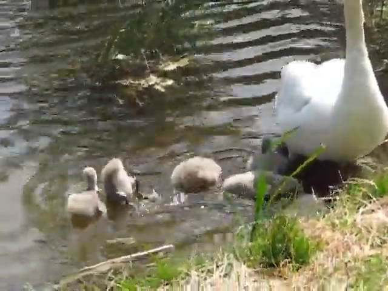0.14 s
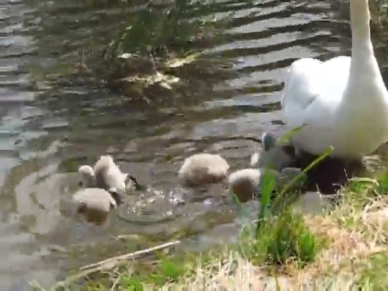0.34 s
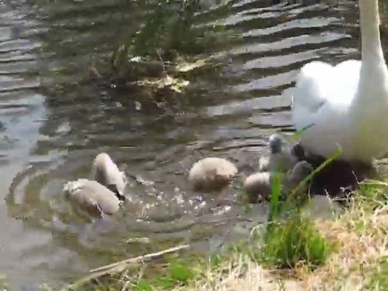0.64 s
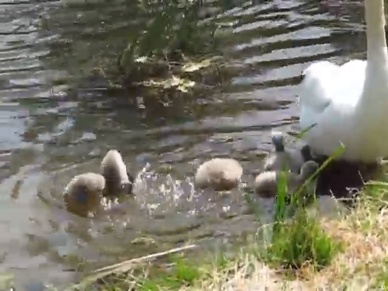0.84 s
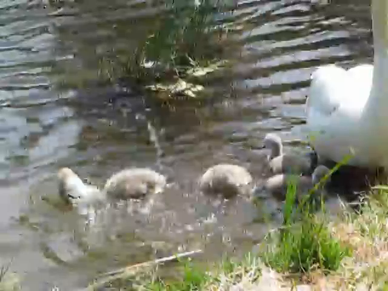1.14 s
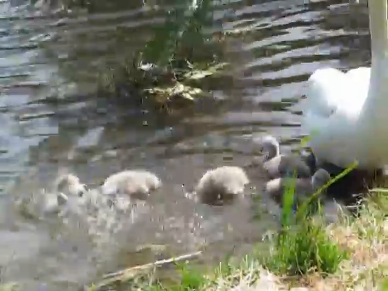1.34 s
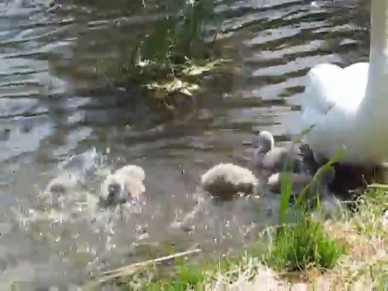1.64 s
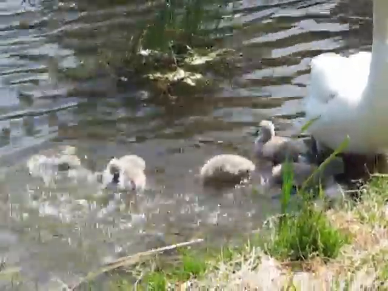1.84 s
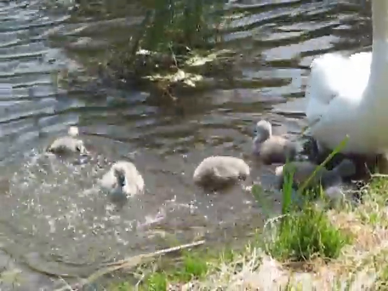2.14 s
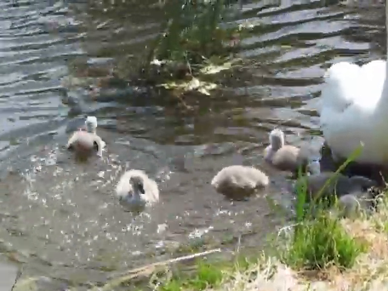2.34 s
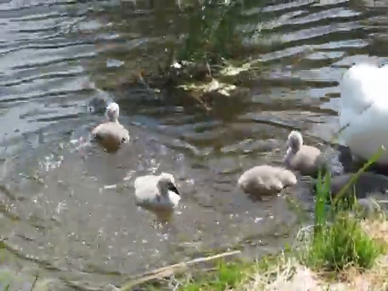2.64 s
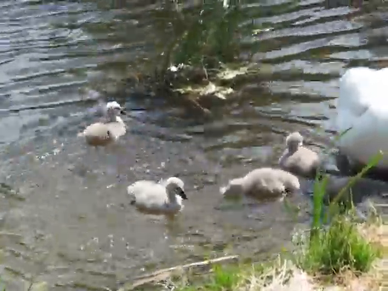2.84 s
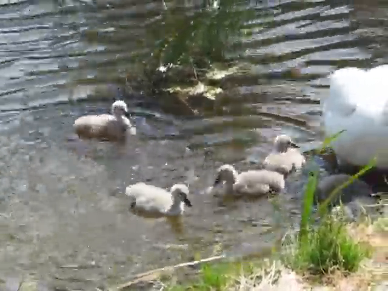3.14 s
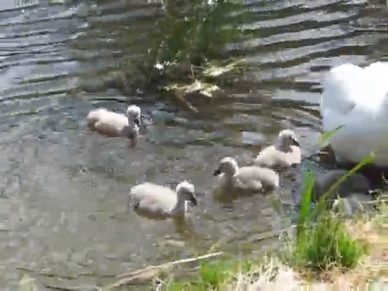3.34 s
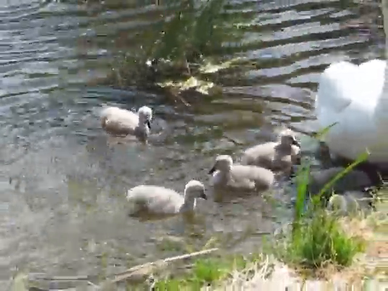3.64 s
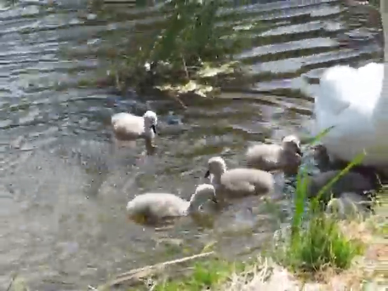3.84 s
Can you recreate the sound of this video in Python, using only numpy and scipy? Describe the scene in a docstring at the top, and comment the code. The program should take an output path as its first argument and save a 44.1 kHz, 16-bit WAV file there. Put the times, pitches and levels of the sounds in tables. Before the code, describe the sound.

Young swans splash in shallow water by a bank, with early honks and gusty wind on the microphone

```python
"""Cygnets and swan by a windy bank

Close by, cygnets splash in shallow water beside a bank: rising bubble tones, noise puffs, ticks and fine drops.
A swan off to one side honks twice, pulses and breath noise in a resonant throat; a chick peeps faint whistles.
Gusty wind buffets the two microphone ports separately, as shaped noise with sharp thumps.
Far off lies a wash of shaped noise with a hum near 850 Hz, and a thin throbbing whine."""
import sys
import numpy as np
from scipy import signal
from scipy.fft import rfft, irfft
from scipy.io import wavfile
from scipy.ndimage import uniform_filter1d

SR = 44100
rng = np.random.default_rng(int(sys.argv[2]) if len(sys.argv) > 2 else 0)


def materialize(psi):
    """Save the field psi as 16-bit PCM at rate SR to the path in sys.argv[1].

    A 1-D psi becomes a single channel; in a 2-D psi each row is a channel.
    """
    bounded = np.clip(np.atleast_2d(psi).T, -1, 1)
    quanta = np.round(bounded * 32767).astype(np.int16)
    wavfile.write(sys.argv[1], SR, quanta)


N = 176400  # 4 s


def amp(db):
    """Gain from dB."""
    return 10 ** (np.asarray(db) / 20)


def evened(x):
    """Scales to rms 1."""
    return x / np.sqrt(np.mean(x ** 2) + 1e-20)


def read(points, hz):
    """Spectrum table at given frequencies, interpolated along log frequency."""
    f, value = np.transpose(points)
    return np.interp(np.log(hz + 1), np.log(f + 1), value)


def curve(rows, t):
    """Columns of a curve table at given times."""
    s, *cols = np.transpose(rows)
    return [np.interp(t, s, c) for c in cols]


def add(mix, s, sound):
    """Mixes a sound in at a time in seconds."""
    part = mix[round(s * SR):][:len(sound)]
    part += sound[:len(part)]


def coloured(points):
    """Two unrelated channels of noise with a given spectrum, joint rms 1."""
    gain = amp(read(points, np.fft.rfftfreq(N, 1 / SR)))
    return evened(irfft(rfft(rng.standard_normal((2, N))) * gain, N))


def resonate(x, hz, width):
    """A resonance of gain 1, fixed or moving: shift to 0 Hz, smooth, shift back."""
    turn = np.exp(2j * np.pi * np.cumsum(hz * np.ones(len(x))) / SR)
    r = np.exp(-np.pi * width / SR)
    return 2 * (turn * signal.lfilter([1 - r], [1, -r], x / turn)).real


# Likeness of the two microphone ports: (frequency [Hz], shared share [0-1])
PORT_LIKENESS = [(60, 0.13), (180, 0.7), (550, 1), (1650, 0.5), (4970, 0.2), (15000, 1)]
# Port balance: (frequency [Hz], left minus right [dB])
PORT_BALANCE = [(60, -6), (180, 0), (550, 1), (1650, -4.5), (4970, -2), (15000, 2)]
# Port phase: (frequency [Hz], lead of the left port [rad])
PORT_LEAD = [(0, 0.13), (1290, 0.47), (2840, 0.48), (4130, 0.75), (4820, 0.28), (15200, 1)]


def ports(x, other, balance=PORT_BALANCE, lead=PORT_LEAD):
    """Sound reaching both microphone ports: balance and phase lead, the right also taking in another sound."""
    hz = np.fft.rfftfreq(N, 1 / SR)
    same = np.clip(read(PORT_LIKENESS, hz), 0, 1)
    half = amp(read(balance, hz) / 2)
    left = rfft(x)
    right = same * left * np.exp(-1j * read(lead, hz)) + np.sqrt(1 - same ** 2) * rfft(other)
    return irfft([left * half, right / half], N)


# Far background, before the trims below: (time [s], hum level [dB], treble level [dB])
WASH_LEVEL = [(0.0, -44, -49), (0.63, -43.5, -50.5), (1.53, -40.5, -48.5), (2.38, -51, -55),
              (4.0, -55, -58.5)]
# Spectrum of the far hum: (frequency [Hz], relative level [dB per Hz])
HUM_SPECTRUM = [(150, -21), (350, -1.5), (550, -6), (850, 2.5), (1100, -4), (1400, -10.5), (2200, -20.5),
                (3500, -29)]
# Spectrum of the far hiss: (frequency [Hz], relative level [dB per Hz])
HISS_SPECTRUM = [(880, -16), (1500, -1.5), (2830, -2), (4440, -6.5), (5510, -6.5), (8150, -13),
                 (15600, -29.5)]
HUM_DB, HISS_DB, WHINE_DB = 3.5, 3, -17.5  # trims on the levels; the whine follows the treble
WHINE_HZ, WHINE_THROB_HZ = 7882, 30


def wash():
    """Distant hum and smooth hiss as shaped noise, with a thin throbbing whine equal on both ports."""
    t = np.arange(N) / SR
    hum_db, hiss_db = curve(WASH_LEVEL, t)
    hum = amp(hum_db + HUM_DB) * coloured([(60, -24)] + HUM_SPECTRUM + [(7000, -50)])
    hiss = amp(hiss_db + HISS_DB) * coloured([(500, -22)] + HISS_SPECTRUM)
    throb = 1 + 0.79 * np.sin(2 * np.pi * WHINE_THROB_HZ * t)
    whine = amp(hiss_db + WHINE_DB) * np.sin(2 * np.pi * WHINE_HZ * t) * throb
    return ports(*(hum + hiss)) + whine


# Wind on the microphone, level of the rumble and body: (time [s], left port [dB], right port [dB])
GUSTS = [(0.0, -33, -19), (0.06, -18, -10), (0.1, -34, -18), (0.19, -21, -19), (0.23, -23, -28.5),
         (0.44, -35, -15.5), (0.48, -33, -11), (0.53, -34, -25.5), (0.62, -25, -13.5), (0.66, -36, -21.5),
         (0.74, -27, -17.5), (0.81, -35, -26), (0.84, -16.5, -28), (0.93, -31.5, -25.5), (1.06, -29, -29),
         (1.6, -34.5, -30), (1.7, -16.5, -19), (1.73, -45, -16), (1.78, -10, -27.5), (1.83, -15, -10),
         (1.9, -10.5, -18), (1.94, -35, -16.5), (2.03, -16.5, -21.5), (2.09, -13.5, -8.5), (2.32, -34, -17),
         (2.36, -14, -12.5), (2.43, -28.5, -17), (2.46, -11, -19.5), (2.51, -31, -16.5),
         (2.7, -23.5, -11.5), (2.75, -7.5, -8), (2.84, -18, -17.5), (3.11, -20, -10), (3.18, -25, -13.5),
         (3.22, -14.5, -14), (3.25, -29, -17), (3.29, -16.5, -15), (3.5, -32.5, -17), (3.54, -12.5, -9),
         (3.58, -19.5, -10.5), (3.62, -24, -14.5), (3.66, -19, -12), (3.79, -28, -13.5), (4.0, -10.5, -16)]
# Wind rumble: (frequency [Hz], relative level [dB per Hz])
RUMBLE = [(12, -3.5), (30, 0.5), (60, 1), (90, -0.5), (140, -17.5), (300, -33), (900, -97)]
# Body of the stronger gusts: (frequency [Hz], relative level [dB per Hz])
BODY = [(40, -69), (80, -3.5), (130, 0), (180, -4.5), (250, -20.5), (450, -60), (900, -94)]
# Brighter buffeting: (frequency [Hz], relative level [dB per Hz])
BUFFET = [(100, -48), (220, 4.5), (300, -2.5), (420, -8.5), (650, -21.5), (1500, -55)]
# Sharp thumps in the gusts, the push about 3 ms after the time:
# (time [s], peak above 180 Hz before port split and limit [dB], left minus right before ONE_SIDED [dB])
THUMPS = [(0.62, -17.5, -20.0), (1.808, -5, 7.5), (1.896, -8.5, -9.5), (2.109, -9, 1), (2.353, -11, -13),
          (2.401, -3, -13), (2.449, -2.5, -7.5), (2.462, -10, -13), (2.749, -14, 16), (2.792, -8, -5),
          (3.066, -33, -14), (3.11, -7, -8), (3.135, -21, -8), (3.531, -9.5, -9), (3.789, -4, -22),
          (3.921, -14, -15)]
STRONG_DB = -14.5  # port level of a strong gust
BODY_DB, BODY_GROWTH = -0.5, 0.28  # share at a strong gust [dB], growth per dB
BUFFET_DB, BUFFET_GROWTH = -17, 0.73  # likewise
LUMP_DB, LUMP_S = 4.5, 0.017  # depth of the lumps, smoothing time
RUMBLE_LUMP, BUFFET_LUMP = 0.47, 1.04  # factors on the lump depth
THUMP_S, THUMP_BACK = .0011, 0.31  # half-length of the inward push [s], size of the slower swing back
THUMP_BASS_DB = 6.5  # full peak over its part above 180 Hz
ONE_SIDED = 1.95  # how strongly a thump keeps to one port
WIND_LIMIT = .96  # ceiling of the soft limit


def wind():
    """Lumpy rumble per port; stronger gusts carry more body and brighter buffeting; thumps push inward."""
    port_db = np.array(curve(GUSTS, np.arange(N) / SR))
    size = int(LUMP_S * SR)
    slow = uniform_filter1d(uniform_filter1d(rng.standard_normal((2, N)), size), size)
    lump_db = LUMP_DB * np.clip(evened(slow), -2.5, 2.2)
    rumble = evened(coloured(RUMBLE) * amp(RUMBLE_LUMP * lump_db))
    body = evened(coloured(BODY) * amp(lump_db))
    buffet = evened(coloured(BUFFET) * amp(BUFFET_LUMP * lump_db))
    over_db = port_db - STRONG_DB
    body_share = amp(BODY_DB + BODY_GROWTH * over_db)
    push = (rumble + body_share * body) / np.sqrt(1 + body_share ** 2)
    push = push + amp(BUFFET_DB + BUFFET_GROWTH * over_db) * buffet
    push = amp(port_db) * push
    t = np.arange(-500, 900) / SR
    swing_back = THUMP_BACK * np.exp(-((t - 1.94 * THUMP_S) / (2.9 * THUMP_S)) ** 2)
    thump = swing_back - np.exp(-(t / THUMP_S) ** 2)
    for s, db, pan in THUMPS:
        for side, sign in zip(push, (-1, 1)):
            port_gain = 1 / np.sqrt(1 + amp(2 * ONE_SIDED * sign * pan))
            add(side, s - .008, amp(db + THUMP_BASS_DB) * port_gain * thump)
    return push / (1 + (push / WIND_LIMIT) ** 4) ** (1 / 4)


# Chick's peeps: (start [s], length [s], start pitch [Hz], top pitch [Hz], end pitch [Hz], level [dB])
PEEPS = [(1.955, .07, 1900, 2300, 2250, -57), (2.832, .092, 1860, 2500, 2000, -55.5),
         (3.262, .061, 1830, 2220, 1960, -56)]
PEAK_AT = 1.4  # above 1 sets the top of the pitch arch past the middle


def peep(start, length, from_hz, top_hz, end_hz, db):
    """A thin sine whistle that arches up in pitch and falls."""
    u = np.arange(0, 1, 1 / (length * SR))
    bent = u ** PEAK_AT
    arch = 1 - abs(1 - 2 * bent) ** 1.6
    hz = top_hz - (1 - arch) * np.where(bent < .5, top_hz - from_hz, top_hz - end_hz)
    fade = np.minimum(np.minimum(u, 1 - u) / 0.075, 1)
    return start, amp(db) * np.sqrt(2) * fade * np.sin(2 * np.pi * np.cumsum(hz) / SR)


# The swan's two honks, ahead of the port balance: (time [s], pitch [Hz], level [dB], roughness [0-1, clipped])
HONKS = [
    [(.192, 524, -58, 0), (.202, 492, -32, 0.3), (.227, 474, -28, 0.31), (.243, 457.5, -33.5, 0.4),
     (.256, 379, -32, 0.9), (.272, 340, -42, 1.1), (.285, 320, -49, 0.8)],
    [(.352, 587.7, -40.5, 0.6), (.36, 582, -29.5, 0.68), (.378, 562.7, -37, 0.4), (.39, 542, -25, 0.6),
     (.413, 541.7, -29.5, 0.6), (.436, 575, -29.5, 0.47), (.456, 553, -37, 0.3), (.475, 552, -47, 0.4)],
]
# Throat resonances, before mouth and width factors: (frequency [Hz], width [Hz], level [dB])
THROAT = [(570, 90, -3), (1050, 230, 0), (2020, 280, 0), (2500, 300, -10), (3950, 450, -23)]
FLUTTER_HZ, FLUTTER = 83.2, 0.59  # mean rate; depth at full roughness
JITTER = .5  # random pitch wander at full roughness
OPEN_HZ, MOUTH = 520, .35  # pitch at which the throat sits as tabled; how far it follows the pitch


def honk(rows):
    """Pulses and gated breath noise drive the throat; roughness adds breath, jitter and flutter."""
    t = np.arange(rows[0][0], rows[-1][0], 1 / SR)
    hz, level_db, rough = curve(rows, t)
    rough = np.clip(rough, 0, 1)
    wander = uniform_filter1d(rng.standard_normal(len(t)), 60)
    turns = np.cumsum(hz * (1 + JITTER * rough * wander)) / SR
    folds = sum(np.cos(2 * np.pi * k * turns) for k in range(1, 11))
    flutter_hz = FLUTTER_HZ * (1 + 4.7 * uniform_filter1d(rng.standard_normal(len(t)), 500))
    folds = folds * np.exp(FLUTTER * rough * np.sin(2 * np.pi * np.cumsum(flutter_hz) / SR))
    # breath bursts at the start of each cycle, then dies away
    puffs = (0.19 + np.exp(-(turns % 1) / 0.21)) * rng.standard_normal(len(t))
    drive = (1 - rough) * evened(folds) + rough * evened(puffs)
    mouth = (hz / OPEN_HZ) ** MOUTH
    throat = np.zeros(len(t))
    for k, (f, width, db) in enumerate(THROAT):
        ring = resonate(resonate(drive, f * mouth, 1.32 * width), f * mouth, 1.76 * width)
        throat += (-1) ** k * amp(db) * ring
    return t[0], amp(level_db) * evened(throat)


GLIDE = 12  # relative pitch rise per s


def swell(t, length):
    """Envelope that reaches 1 at the given length and dies away."""
    return t / length * np.exp(1 - t / length)


def bubble(hz, length):
    """A small bubble: a brief tone with rising pitch, swelling and dying."""
    t = np.arange(1500) / SR
    return np.sin(2 * np.pi * hz * (t + GLIDE * t ** 2 / 2)) * swell(t, length)


def burst(hz, width, length):
    """A short puff of noise around a centre, peak 1."""
    t = np.arange(1500) / SR
    puff = rng.standard_normal(len(t)) * swell(t, length) ** 2
    for _ in range(3):
        puff = resonate(puff, hz, width)
    return puff / abs(puff).max()


TICK_CYCLES = .6  # half-length of a tick


def tick(hz):
    """A sharp wide click: about one cycle."""
    turns = np.arange(-40, 40) / SR * hz
    return np.sin(2 * np.pi * turns) * np.exp(-(turns / TICK_CYCLES) ** 2)


def patter():
    """Randomly timed fine drops, as small bubbles in 24 pitches, rms 1."""
    drops_per_s, spread_db, cycles, tilt_db = 1500, 4., 4., -3  # tilt per octave
    size = amp(spread_db * np.minimum(rng.exponential(1, N), 4)) * (rng.random(N) < drops_per_s / SR)
    kind = rng.integers(0, 24, N)
    drops = np.zeros(N)
    for k, hz in enumerate(np.geomspace(1700, 10500, 24)):
        drop = bubble(hz, cycles / (6 * hz)) * amp(tilt_db * np.log2(hz / 1000))
        drops += signal.oaconvolve(size * (kind == k), drop)[:N]
    return evened(drops)


# Close plops, level before the near gain: (time [s], level [dB], pitch [Hz], swelling time [ms])
PLOPS = [(0.3428, -32, 1830, 2.7), (0.6848, -34.5, 2530, 1.7), (0.7196, -38, 2390, 1.56),
         (0.859, -31, 3340, 2.3), (0.9191, -30.5, 4080, 2), (1.049, -31.5, 2686, 2.15),
         (1.118, -21.5, 2360, 2), (1.12, -18, 2020, 1.47), (1.1255, -33, 1900, 1), (1.204, -38, 3720, 2.2),
         (1.241, -36, 4900, 0.76), (1.251, -34, 2610, 2.37), (1.2916, -32, 1830, 2.6),
         (1.313, -29.5, 2280, 1.7), (1.3347, -36, 2640, 2.2), (1.3788, -35.5, 4900, 1.7),
         (1.4217, -38, 1690, 3.8), (1.5227, -33, 2280, 1.75), (1.5442, -33, 3040, 2.3),
         (1.6735, -29, 2720, 2.2), (1.6834, -30, 2450, 1.9), (1.839, -33, 2130, 1.9),
         (1.8617, -32, 1830, 2.8), (1.8844, -34.5, 3225, 2.2), (2.064, -38, 2050, 0.86),
         (2.1137, -36, 2600, 1.33)]
# Bright ticks of drops, level before the near gain: (time [s], level [dB], centre [Hz])
TICKS = [(0.245, -26, 6160), (.721, -31, 6960), (.746, -31, 10500), (0.86, -23, 6200), (0.924, -19, 5800),
         (1.122, -40, 12000), (1.202, -25, 7900), (1.205, -39, 11000), (1.346, -31, 7000),
         (1.358, -36, 6000), (1.418, -32, 12500), (1.447, -36, 7000), (1.485, -33, 10000),
         (1.507, -36, 11500), (1.526, -24, 6500), (1.531, -24, 6000), (1.542, -30, 6000),
         (1.574, -31, 8500), (1.784, -36, 6000), (1.801, -35, 12500), (1.854, -30, 7260),
         (2.297, -38, 10500), (2.395, -36.5, 9500), (2.752, -48, 11000)]
# Stirred water, before the near gain: (time [s], level of fine droplets [dB])
STIR = [(.8, -60), (1.2, -50), (1.55, -46.5), (1.8, -49.5), (2.12, -61)]
# Droplets before and after the splashing, one row each: (time [s], level [dB])
CALM = [(.55, -75), (2.3, -80)]
RING = .5  # gain of the pure tone in a plop
SPRAY_WIDTH = .7  # width of a plop's noise, as a share of its pitch


def splashes():
    """Close water: each plop is a bubble tone with a noise puff, among bright ticks and a patter of drops."""
    out = np.zeros(N)
    for s, db, hz, ms in PLOPS:
        length = max(ms, .3) / 1000
        plop = RING * bubble(hz, length) + burst(hz, SPRAY_WIDTH * hz, length)
        add(out, s - length / 2, amp(db) * plop)
    for s, db, hz in TICKS:
        add(out, s, amp(db) * tick(hz))
    drops_db = curve(CALM[:1] + STIR + CALM[1:], np.arange(N) / SR)[0]
    return out + patter() * amp(drops_db)


BANK_DB, BANK_T60 = -9, .008  # scatter level; decay time [s]


def bank(x):
    """Brief scatter from the water surface and bank: sparse random reflections that die away."""
    t = np.arange(1200) / SR
    taps = rng.choice([-1., 1.], len(t)) * (rng.random(len(t)) < .15) * amp(-60 * t / BANK_T60)
    return signal.oaconvolve(x, taps / np.linalg.norm(taps))[:N]


# The swan stands off to one side: (frequency [Hz], left minus right [dB])
SWAN_BALANCE = [(450, -1.5), (1200, 4), (2000, -7.5), (3300, 19)]
# Phase of the swan at the ports: (frequency [Hz], lead of the left port [rad])
SWAN_LEAD = [(500, 0.23), (1100, 1), (2000, 0.49), (4000, 0.5)]
NEAR_DB = 3.0  # gain of water and chick


def scene():
    """Water, chick and swan at the port pair, over the far wash and the wind."""
    water = splashes()
    swan, chick = np.zeros((2, N))
    for rows in HONKS:
        add(swan, *honk(rows))
    for row in PEEPS:
        add(chick, *peep(*row))
    echo = bank(water)
    near = amp(NEAR_DB) * ports(water + chick + amp(BANK_DB) * echo, echo)
    return near + ports(swan, swan, SWAN_BALANCE, SWAN_LEAD) + wash() + wind()


def record(dry):
    """Band limit: a steep low-pass at 15750 Hz."""
    low_pass = signal.firwin(2047, 15750, window=("kaiser", 9), fs=SR)
    return signal.oaconvolve(dry, low_pass[None], "same")


dry = scene()
out = record(dry)
materialize(out)
```